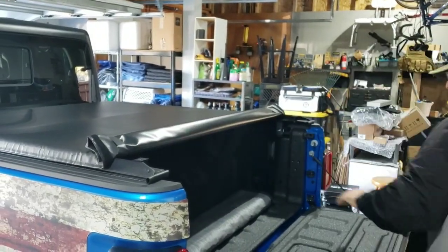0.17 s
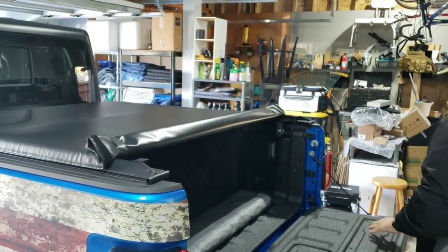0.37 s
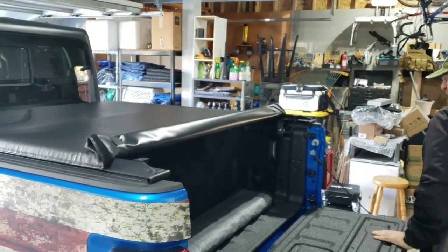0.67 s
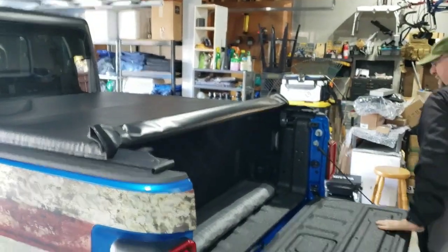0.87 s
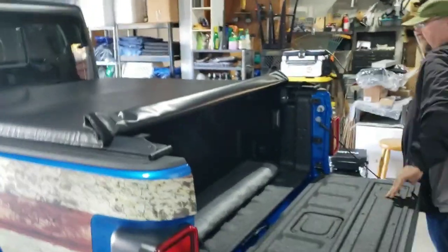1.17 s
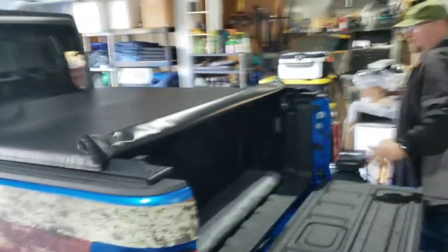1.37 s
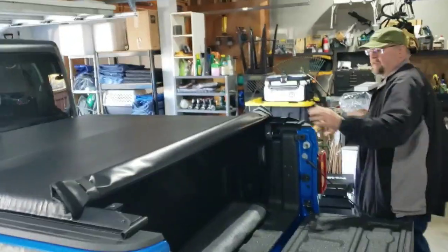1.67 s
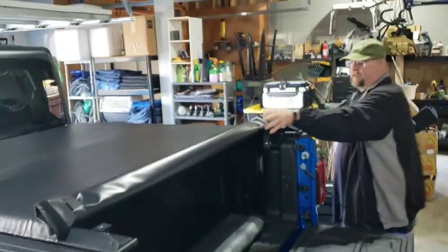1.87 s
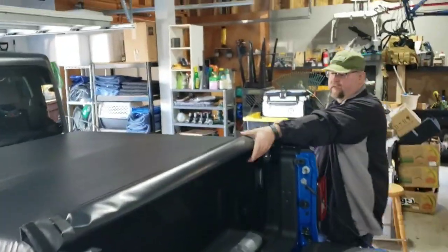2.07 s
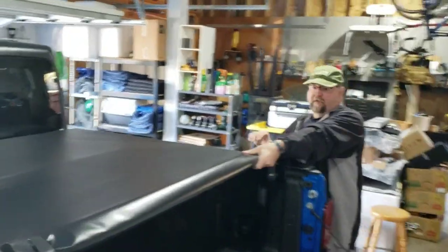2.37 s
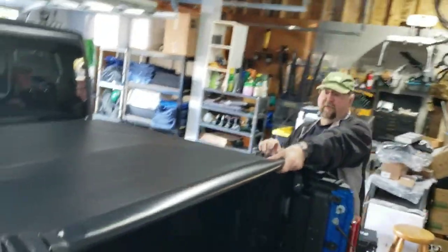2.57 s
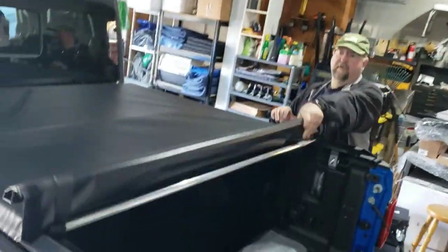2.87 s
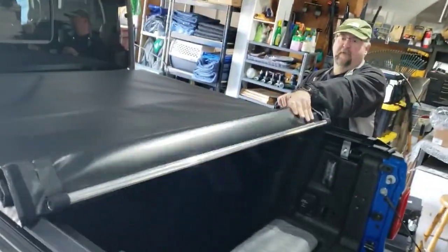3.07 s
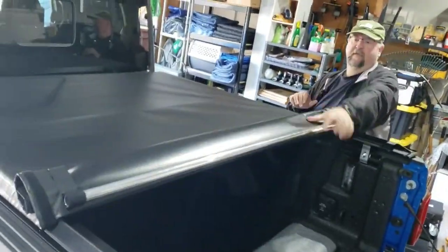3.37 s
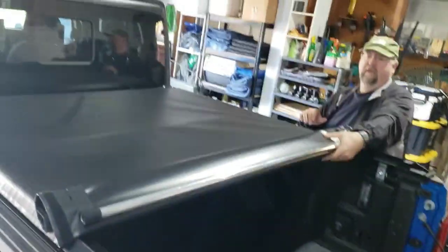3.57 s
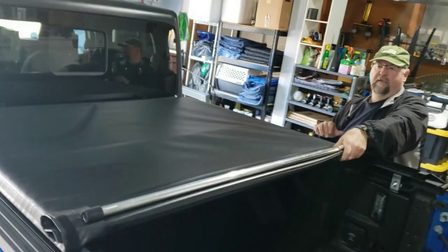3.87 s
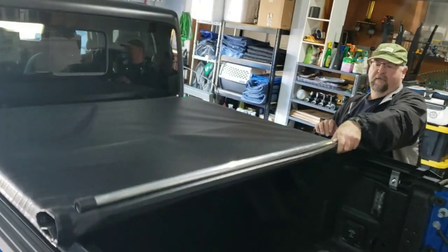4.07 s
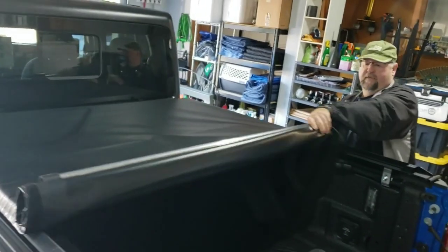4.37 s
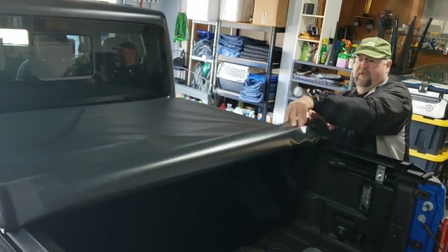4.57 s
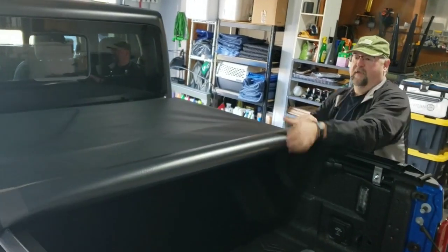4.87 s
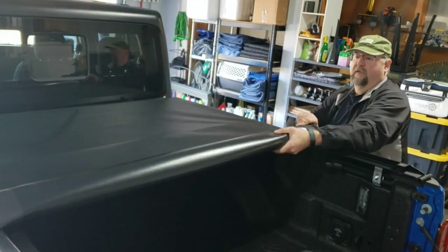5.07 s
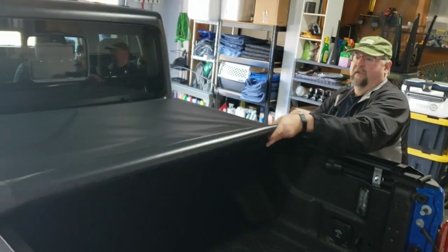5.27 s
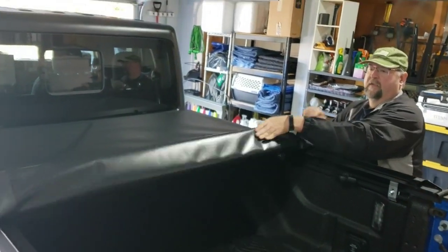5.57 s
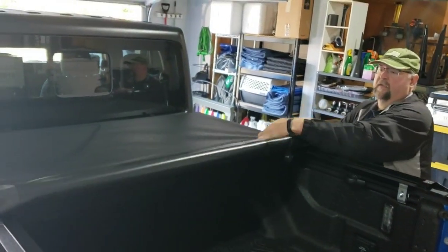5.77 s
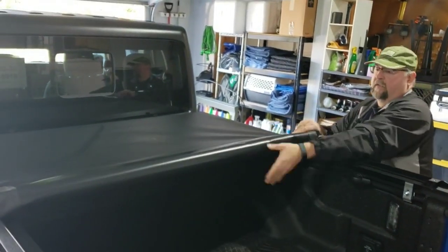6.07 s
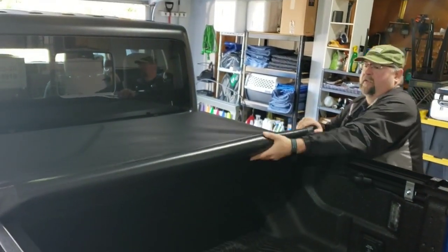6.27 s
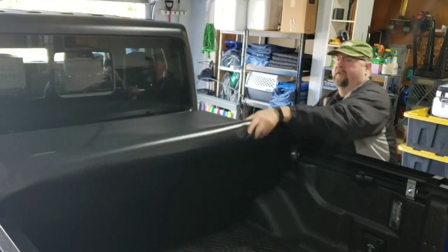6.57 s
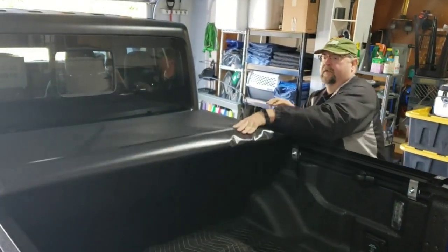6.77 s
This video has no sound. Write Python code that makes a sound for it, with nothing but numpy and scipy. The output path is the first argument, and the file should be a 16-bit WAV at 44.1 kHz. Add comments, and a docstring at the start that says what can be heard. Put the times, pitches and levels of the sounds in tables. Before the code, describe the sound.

Handling rubs and dull bumps on a hand-held camera, then hook-and-loop strip tears off in crackling bursts as a vinyl cover is rolled in a garage.

```python
"""Truck bed cover rolled up

A soft vinyl bed cover is rolled up by hand in a garage. In four turns its hook-and-loop strip tears off
the rail: clicks in avalanches are filtered into crack, cover ring and vinyl rustle; large snaps stand out.
Sagging sines bump, jerky noise rubs on the hand-held camera's case, a sleeve swishes as swelling noise,
and a harmonic lens drive buzzes, over a steady noise floor."""
import sys
import numpy as np
from scipy import signal
from scipy.io import wavfile
from scipy.ndimage import uniform_filter1d

SR = 44100
rng = np.random.default_rng(int(sys.argv[2]) if len(sys.argv) > 2 else 0)


def bounce(signal):
    """Save signal as a 16-bit WAV file at the path given by the first command-line argument."""
    frames = np.transpose(np.atleast_2d(signal))
    limited = np.clip(frames, -1, 1)
    pcm = np.round(limited * 32767).astype(np.int16)
    wavfile.write(sys.argv[1], SR, pcm)


N = 305172
TIME = np.arange(N) / SR


def gain_of(db):
    """Decibels to amplitude."""
    return 10 ** (np.asarray(db) / 20)


def evened(x):
    """Scales to rms 1."""
    return x / np.sqrt(np.mean(x ** 2) + 1e-20)


def steadied(x, span_s):
    """Holds the rms near 1 over span_s and keeps all faster flicker."""
    size = max(int(span_s * SR), 8)
    power = uniform_filter1d(uniform_filter1d(x ** 2, size), size // 2)
    return x / np.sqrt(abs(power) + 1e-12)


def add(mix, start_s, sound):
    """Mixes a sound in at start_s."""
    part = mix[max(round(start_s * SR), 0):][:len(sound)]
    part += sound[:len(part)]


def response(points, size=4096):
    """Minimum-phase impulse response through (freq_hz, level_db) points, 12 dB/octave steeper outside."""
    freq_hz, level_db = np.transpose(points)
    hz = abs(np.fft.fftfreq(size, 1 / SR)) + 1
    octaves_below = np.maximum(np.log2(freq_hz[0] / hz), 0)
    octaves_above = np.maximum(np.log2(hz / freq_hz[-1]), 0)
    curve_db = np.interp(np.log(hz), np.log(freq_hz), level_db) - 12 * (octaves_below + octaves_above)
    log_gain = np.log(gain_of(np.maximum(curve_db, -90)))
    spectrum = np.exp(np.conj(signal.hilbert(log_gain)))
    return np.fft.ifft(spectrum).real[:size // 2]


def coloured(x, points):
    """Passes x through a spectrum."""
    return signal.oaconvolve(x, response(points))[:len(x)]


def blended(x, turn_rad, tailgate, cab):
    """Colours x between its tailgate and its cab spectrum."""
    return np.cos(turn_rad) * coloured(x, tailgate) + np.sin(turn_rad) * coloured(x, cab)


def along_bed(s):
    """Blend angle as the roll advances: 0 at the tailgate, pi/2 at the cab."""
    return np.pi / 2 * np.interp(s, [3.8, 6.2], [0, 1])


def grains(per_s, spread_db):
    """Random clicks of uneven size and either sign."""
    size = gain_of(spread_db * np.clip(rng.standard_normal(N), -2, 2))
    return size * rng.choice([-1, 1], N) * (rng.random(N) < per_s / SR)


def strokes(table, arch_db, edge_db_per_s):
    """Gain of a row of strokes: each arches from its start to its end and falls away on both sides."""
    power = np.zeros(N)
    for start_s, end_s, level_db in table:
        from_middle_s = abs(TIME - (start_s + end_s) / 2)
        half_s = abs(end_s - start_s) / 2
        arch = np.minimum(from_middle_s / half_s, 1) ** 2
        beyond_s = np.clip(from_middle_s - half_s, 0, 1)
        power += gain_of(level_db - arch_db * arch - edge_db_per_s * beyond_s) ** 2
    return np.sqrt(power)


# quiet garage spectrum: freq_hz, level_db
GARAGE_COLOUR = [(25, -4.5), (80, 3.5), (170, -3.5), (620, -11.5), (1500, -17.5), (3400, -23.5),
                 (16000, -31)]


def garage_floor(level_db=-51.0):
    """Steady coloured noise of the quiet garage."""
    return gain_of(level_db) * evened(coloured(rng.standard_normal(N), GARAGE_COLOUR))


BUZZ_HZ = 886
# lens drive refocusing: start_s, length_s, level_db
BUZZES = [(0, .29, -58), (0.886, 0.29, -66), (1.49, 0.16, -60.5)]


def focus_buzz(rolloff=0.58, fade_s=0.0085, count=14):
    """The lens drive buzzes faintly in short runs of a harmonic tone."""
    buzz = np.zeros(N)
    for k in range(1, count):
        buzz += np.cos(2 * np.pi * k * (BUZZ_HZ * TIME + rng.random())) / k ** rolloff
    runs = np.zeros(N)
    for start_s, length_s, level_db in BUZZES:
        to_edge_s = np.minimum(TIME - start_s, start_s + length_s - TIME)
        runs += gain_of(level_db) * np.clip(to_edge_s / fade_s, 0, 1)
    return runs * evened(buzz)


RUB_ARCH_DB, RUB_EDGE_DB_PER_S, RUMBLE_OVER_SCRAPE_DB = 5, 515, 3.5
# fingers rubbing on the camera case: start_s, end_s, scrape_db
RUBS = [(.025, .09, -40), (.11, .3, -54), (.74, 1.1, -53), (1.09, 1.13, -40), (1.145, 1.2, -33),
        (1.2, 1.39, -35.5), (1.405, 1.463, -27), (1.53, 1.75, -50.5), (1.75, 2.0, -44), (2.01, 2.05, -30.5),
        (2.11, 2.23, -46), (2.3, 2.6, -44.5)]
# case rumble spectrum: freq_hz, level_db
RUMBLE_COLOUR = [(25, -15), (60, 3), (170, -2.5), (280, -10.5), (600, -44.5)]
# skin scrape spectrum: freq_hz, level_db
SCRAPE_COLOUR = [(120, -16), (280, 0.5), (480, 1), (750, -2), (1000, -3), (1550, -2), (2000, -8.5),
                 (3300, -17), (8000, -21), (16000, -36)]


def handling(slips_per_s=750, glide=0.56):
    """Skin slips in many tiny jerks over the camera case, which rumbles and scrapes."""
    slips = evened(grains(slips_per_s, 3.6)) + glide * rng.standard_normal(N)
    rumble = gain_of(RUMBLE_OVER_SCRAPE_DB) * steadied(coloured(slips, RUMBLE_COLOUR), 0.04)
    scrape = steadied(coloured(slips, SCRAPE_COLOUR), 0.12)
    return strokes(RUBS, RUB_ARCH_DB, RUB_EDGE_DB_PER_S) * (rumble + scrape)


BUMP_SAG_HZ, BUMP_SAG_S, BUMP_RING_S = 160, 0.0044, 0.022
# dull bumps of hands, roll and camera: start_s, swing_db, pitch_hz, scuff_ratio
BUMPS = [(.04, -26.5, 405, 0.22), (.082, -26.5, 200, 0.24), (.27, -31.5, 60, 0.12), (.696, -30, 157, 0.47),
         (.96, -30.5, 60, 0.17), (1.154, -20, 70, 0.35), (1.834, -25, 55, 0.039), (1.916, -21.5, 80, 0.15),
         (2.394, -26, 70, 0.075), (2.489, -21.5, 54, 0.15), (2.924, -24.5, 596, 0.54),
         (3.182, -36.5, 100, 0.38), (3.65, -40.5, 168, 1.7), (4.451, -19, 62, 0.14),
         (4.712, -30, 1120, 0.22), (5.099, -26.5, 113, 0.14), (6.25, -34, 86, .1)]
# vinyl sheet spectrum, for scuffs and rustle: freq_hz, level_db
VINYL_COLOUR = [(35, -15), (80, 2), (250, 3.5), (450, 4), (700, 3), (1080, 5), (1400, 2), (2500, -6.5),
                (8000, -43)]


def bumps(cycles=5, contact_s=0.008):
    """A soft blow: a few swings that sag to their pitch, and a short scuff at the contact."""
    out, t = np.zeros(N), np.arange(SR // 4) / SR
    noises = rng.standard_normal((len(BUMPS), len(t)))
    for (start_s, swing_db, pitch_hz, scuff_ratio), noise in zip(BUMPS, noises):
        turns = np.cumsum(pitch_hz + BUMP_SAG_HZ * np.exp(-t / BUMP_SAG_S)) / SR
        t60_s = BUMP_RING_S + cycles / pitch_hz
        swing = np.sin(2 * np.pi * turns) * np.exp(-np.log(1000) * t / t60_s)
        scuff = evened(coloured(noise, VINYL_COLOUR)) * np.exp(-t / contact_s)
        add(out, start_s, gain_of(swing_db) * (swing + scuff_ratio * scuff))
    return out


# jacket sleeve brushing past: middle_s, level_db
SWISHES = [(.13, -55.5), (.87, -64), (1.08, -56), (1.61, -53.5), (2.32, -48)]
# cloth spectrum: freq_hz, level_db
CLOTH_COLOUR = [(1500, -5), (4000, -0.5), (9000, -2.5), (16000, -8)]


def sleeve(swish_s=0.093):
    """Cloth slides over cloth in short, airy swells."""
    swell = sum(gain_of(level_db) * np.exp(-((TIME - middle_s) / swish_s) ** 2)
                for middle_s, level_db in SWISHES)
    return swell * evened(coloured(rng.standard_normal(N), CLOTH_COLOUR))


PULL_ARCH_DB, PULL_EDGE_DB_PER_S = 8, 241  # hardest halfway, dying away beyond the ends
FOLD_ARCH_DB, FOLD_EDGE_DB_PER_S = 0.5, 190
CRACK_TAILGATE_DB, CRACK_CAB_DB = 0, -3.5  # crack over ring at either end of the bed
RUSTLE_DB, RUSTLE_EXPONENT = -24.5, 0.57  # rustle grows more slowly than the tearing
# pulls that peel the strip off the rail: start_s, end_s, level_db
PULLS = [(2.48, 3.16, -27.5), (3.60, 3.72, -48.5), (3.78, 3.95, -34), (3.98, 4.06, -41.5),
         (4.08, 4.55, -27), (4.635, 4.675, -32.5), (5.14, 5.53, -22.5), (5.62, 5.745, -23),
         (6.16, 6.78, -26.5), (6.80, 6.85, -31)]
# slack sheet folding as the hands change grip: start_s, end_s, level_db
FOLDS = [(2.3, 2.34, -44.5), (2.68, 2.88, -42.5), (3.76, 3.88, -46.5), (4.66, 4.72, -39.5),
         (4.73, 4.85, -41), (5.07, 5.11, -44.5), (5.23, 5.27, -46), (5.69, 5.73, -49), (6.81, 6.85, -36)]


def peeling(slack_db=-65):
    """The pull sets the gains of rustle, ring and crack; the crack weakens as the roll nears the cab."""
    slack = gain_of(slack_db) * (TIME > PULLS[0][0])
    ring = np.hypot(strokes(PULLS, PULL_ARCH_DB, PULL_EDGE_DB_PER_S), slack)
    crack_over_ring_db = CRACK_TAILGATE_DB + (CRACK_CAB_DB - CRACK_TAILGATE_DB) * np.sin(along_bed(TIME))
    crack = ring * gain_of(crack_over_ring_db)
    folds = strokes(FOLDS, FOLD_ARCH_DB, FOLD_EDGE_DB_PER_S)
    rustle = np.hypot(gain_of(RUSTLE_DB) * ring ** RUSTLE_EXPONENT, folds)
    return rustle, ring, crack


def hook(hz, cycles):
    """One hook springs free: a swing that dies within a few cycles."""
    t = np.arange(128) / SR
    return np.cos(2 * np.pi * hz * t) * np.exp(-t * hz / cycles)


# hook crack spectra at either end of the bed: freq_hz, level_db
CRACK_NEAR_TAILGATE = [(1300, -37), (2800, -1.5), (4500, 0.5), (6500, 0.5), (8000, -3.5), (9000, -2.5),
                       (11000, -8.5), (16000, -22)]
CRACK_NEAR_CAB = [(1300, -12.5), (3300, 0.5), (4600, 2), (5900, -1.5), (7000, -2), (9000, -8.5),
                  (11000, -11.5), (12200, -8), (16000, -11)]
# taut cover and rail ring spectra at either end of the bed: freq_hz, level_db
RING_NEAR_TAILGATE = [(700, -49), (1400, -19.5), (1800, -2), (2350, 1.5), (3100, -4), (5000, -33)]
RING_NEAR_CAB = [(700, -47), (1050, -11.5), (1350, -19.5), (1700, -6), (2200, 2), (2650, -3), (4500, -37)]


def tearing(bursts_per_s=150, burst_s=0.0013, hooks_per_s=5500, stray_per_s=1800, hook_spread_db=-1.0,
            cab_stray_db=3, colour_db=-1.5, steady_db=-38, count=10):
    """Hooks overload their neighbours, so the strip opens in short avalanches that swell and die."""
    burst_spread_db, stray_db = 2.2, -11
    rustle_gain, ring_gain, crack_gain = peeling()
    # a slack strip drops most avalanches
    busy = np.minimum(np.sqrt(ring_gain / gain_of(steady_db)), 1)
    starts_s = np.cumsum(rng.gamma(2, 0.5, 2000)) / bursts_per_s
    at = (starts_s[starts_s < TIME[-1]] * SR).astype(int)
    size, colour = np.clip(rng.standard_normal((len(starts_s), 2)), -2, 2)[:len(at)].T
    happens = rng.random(len(starts_s))[:len(at)] < busy[at]
    sizes = gain_of(burst_spread_db * size) * happens
    swell = np.exp(-(np.linspace(-0.01, 0.01, SR // 50) / burst_s) ** 2)

    # nearer the cab single hooks between avalanches get louder
    turn_rad = along_bed(TIME)
    stray_gain = gain_of(stray_db + cab_stray_db * np.sin(turn_rad)) * busy
    strays = stray_gain * grains(stray_per_s, hook_spread_db)
    crowd = grains(hooks_per_s, hook_spread_db)

    def released(side):
        """Hook clicks; side tilts each avalanche towards tug or crack."""
        peaks = np.bincount(at, sizes * gain_of(side * colour_db * colour), N)
        return strays + crowd * signal.oaconvolve(peaks, swell, "same")

    tugs, cracks = released(0.5), released(-0.5)
    kind = rng.integers(0, count, N)  # each hook has one of several pitches
    swings = np.zeros(N)
    for k, hz in enumerate(np.geomspace(2800, 13000, count)):
        swings += signal.oaconvolve(cracks * (kind == k), evened(hook(hz, 0.44)))[:N]
    crack = steadied(blended(swings, turn_rad, CRACK_NEAR_TAILGATE, CRACK_NEAR_CAB), 0.085)
    ring = steadied(blended(tugs, turn_rad, RING_NEAR_TAILGATE, RING_NEAR_CAB), 0.07)
    # the loose sheet is shaken by the hooks and also crumples on its own
    crumples = evened(grains(400, 2.3))
    rustle = steadied(coloured(evened(tugs) + 1.66 * crumples, VINYL_COLOUR), 0.26)
    return rustle_gain * rustle + ring_gain * ring + crack_gain * crack


SNAP_HZ, SNAP_AT_DB, SNAP_DB_PER_OCTAVE = 5470, -23.5, 18.5  # harder snaps are brighter
# stubborn hook clumps: start_s, ring_db, crack_db (rms over 10 ms), span_s (sets hook count and spread)
SNAPS = [(2.4254, -29.5, -31.5, 0.00026), (2.454, -27.5, -24.5, .0004), (2.4867, -25, -27.5, .0008),
         (2.534, -22, -23, 0.0024), (2.56, -26, -21, 0.0033), (2.585, -29, -23.5, .003),
         (2.6344, -29, -22, 0.0047), (2.9331, -38, -24, .0035), (2.96, -33, -19, .0045),
         (2.991, -43, -19.5, .0001), (3, -27.5, -23, .003), (3.021, -27, -18.5, .006),
         (3.084, -31, -31, 0.0021), (3.1585, -40, -30, .0003), (3.22, -31.5, -21.5, .0001),
         (3.383, -43.5, -47, 0.0011), (3.3208, -33.5, -35, .0004), (3.728, -34, -26.5, .0003),
         (3.767, -33.5, -23, 0.00072), (3.8832, -31, -22.5, 0.0032), (3.8926, -28.5, -22, .0001),
         (4.089, -28.5, -31.5, 0.0021), (4.168, -24, -23.5, 0.0045), (4.2178, -24, -23, 0.00085),
         (4.3428, -24.5, -24, 0.0032), (4.5371, -26.5, -32, .0006), (5.165, -20, -22.5, .006),
         (5.3, -22, -20, .0054), (5.321, -31, -20, .005), (5.4006, -28, -24.5, .001),
         (5.52, -27.5, -24, .0013), (5.8464, -36.5, -41, 0.0013), (6.0534, -41, -37.5, .001),
         (6.141, -29, -32.5, 0.0029), (6.4685, -21, -19.5, 0.0046)]


def snaps(hooks_per_s=2200, weak_db=-19, run_db=-7, count=16):
    """Large bursts: a stubborn hook snaps amid three weak ones, then a run of others follows."""
    cycles, spread_ratio = 0.63, 1.6
    out, size, lead_s = np.zeros(N), SR // 100, 0.003
    chances = rng.random((len(SNAPS), count, 3))
    for (start_s, ring_db, crack_db, span_s), chance in zip(SNAPS, chances):
        snap_hz = SNAP_HZ * 2 ** ((crack_db - SNAP_AT_DB) / SNAP_DB_PER_OCTAVE)
        pulls, swings = np.zeros((2, SR // 20))
        for k, (when, strength, detune) in enumerate(chance[:int(span_s * hooks_per_s) + 4]):
            is_weak, is_run = k < 3, k > 3  # hook 3 is the stubborn one
            pull = gain_of(weak_db * is_weak + run_db * strength * is_run) * (-1) ** k
            delay_s = 2 * lead_s * when if is_weak else lead_s + 1.3 * span_s * when * is_run
            hook_hz = snap_hz * spread_ratio ** ((2 * detune - 1) * is_run)
            add(pulls, delay_s, np.array([pull]))
            add(swings, delay_s, pull * hook(hook_hz, cycles))
        turn_rad = along_bed(start_s)
        crack = blended(swings, turn_rad, CRACK_NEAR_TAILGATE, CRACK_NEAR_CAB)
        ring = blended(pulls, turn_rad, RING_NEAR_TAILGATE, RING_NEAR_CAB)
        for level_db, sound in (ring_db, ring), (crack_db, crack):
            add(out, start_s - lead_s, gain_of(level_db) * sound * np.sqrt(size) / np.linalg.norm(sound))
    return out


def garage(x, near_db=-16, tail_db=-24, near_s=0.036, tail_t60_s=0.83):
    """Quick echoes from the bed walls and cab, then the faint, dull tail of a cluttered room."""
    t = np.arange(SR) / SR
    taps = rng.standard_normal(SR) * (rng.random(SR) < 2000 / SR) * (t > 0.002)
    near = taps * np.exp(-t / near_s)
    dull = signal.lfilter(*signal.butter(1, 1500, fs=SR), taps[::-1])
    tail = dull * gain_of(-60 * t / tail_t60_s)
    echoes = gain_of(near_db) * near / np.linalg.norm(near) + gain_of(tail_db) * tail / np.linalg.norm(tail)
    return x + signal.oaconvolve(x, echoes)[:N]


def scene():
    """The cover and bumps in the room, plus close handling, sleeve, lens drive and the garage floor."""
    floor = garage_floor()
    in_room = garage(tearing() + snaps() + bumps())
    return (in_room + handling() + sleeve() + focus_buzz() + floor)[None]


def record(dry, bass_cut_hz=38, edge_hz=15950):
    """The microphone sheds the deepest bass; then the band limit."""
    lean = signal.lfilter(*signal.butter(2, bass_cut_hz, "high", fs=SR), dry)
    band_limit = signal.firwin(511, edge_hz, window=("kaiser", 9), fs=SR)
    return signal.oaconvolve(lean, band_limit[None], "same")


dry = scene()
out = record(dry)
bounce(out)
```